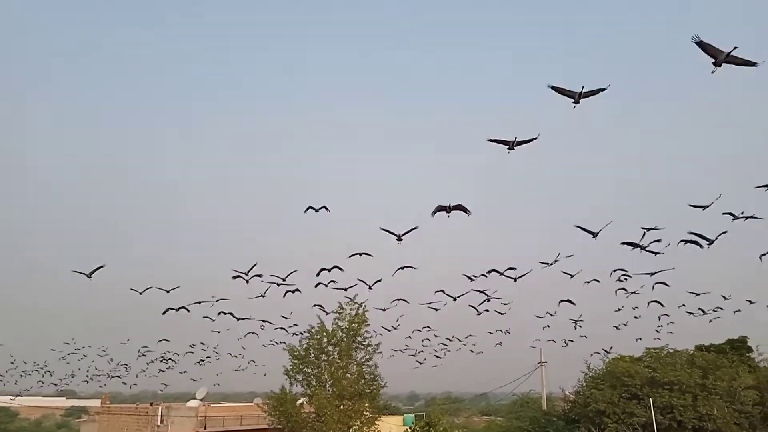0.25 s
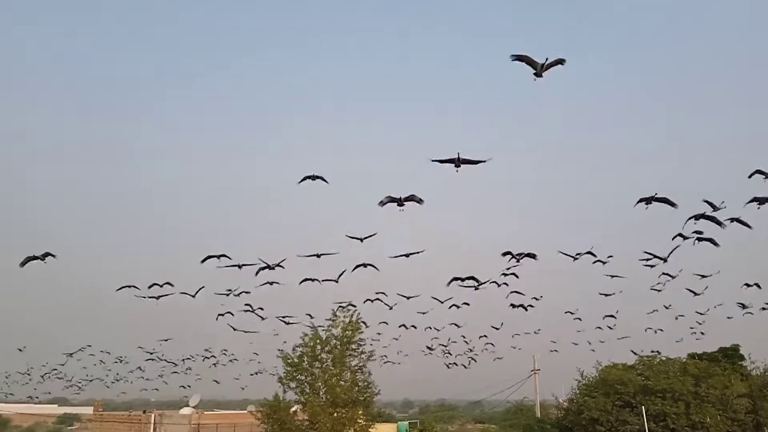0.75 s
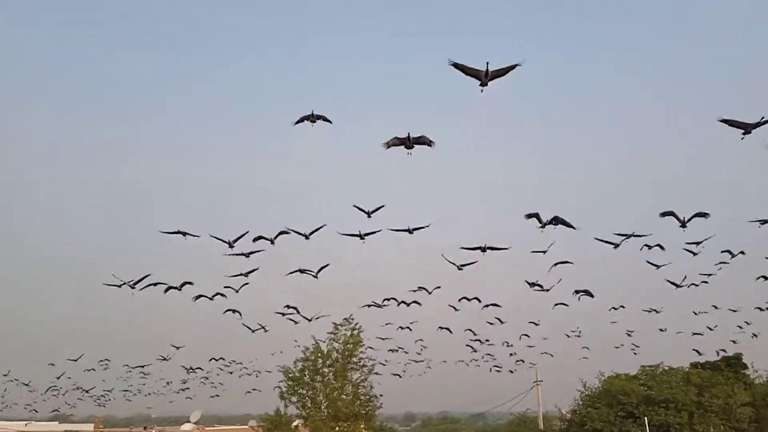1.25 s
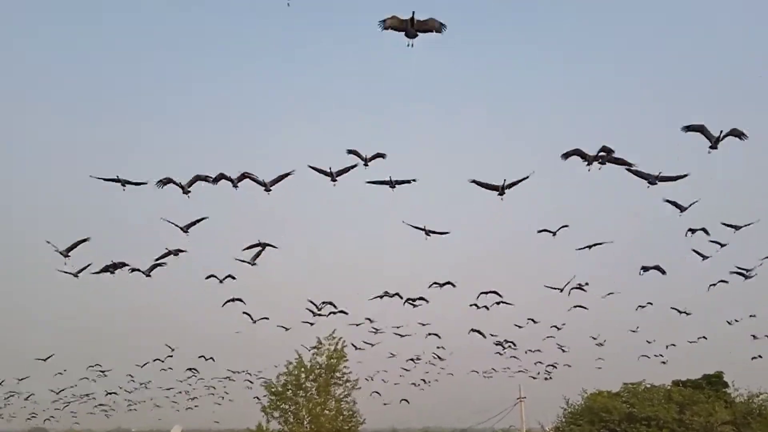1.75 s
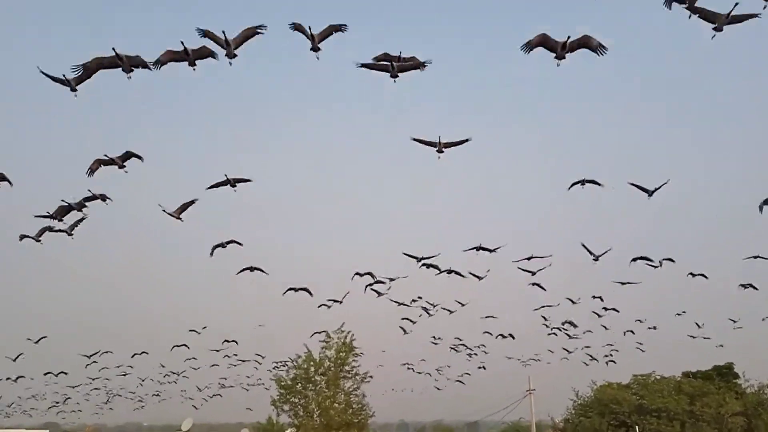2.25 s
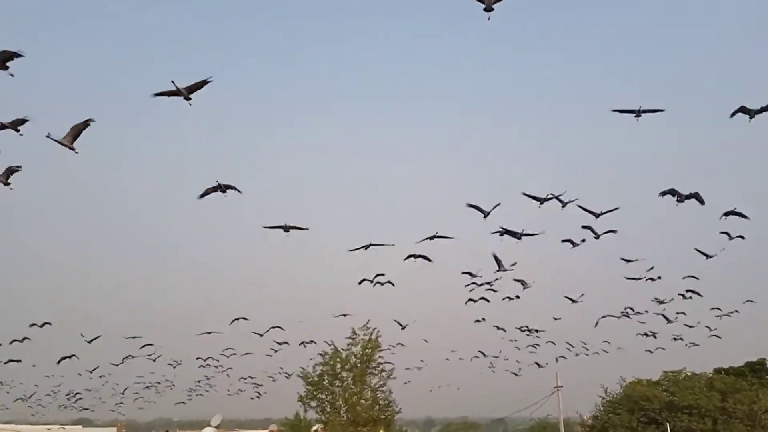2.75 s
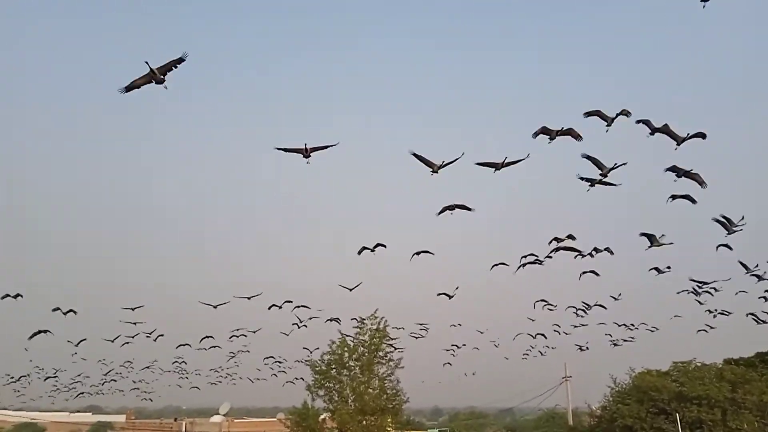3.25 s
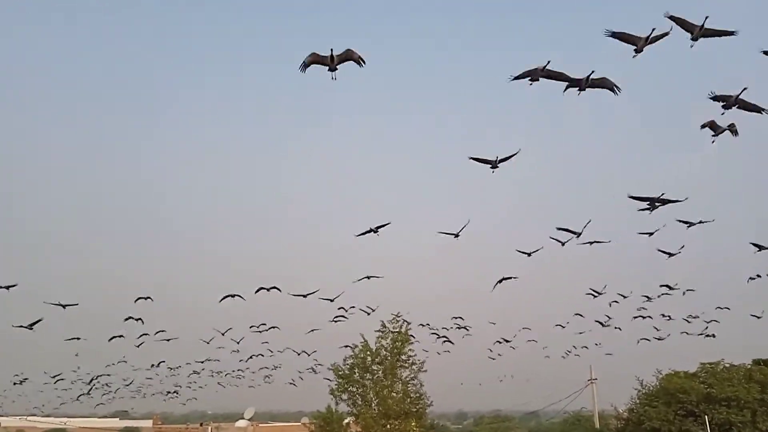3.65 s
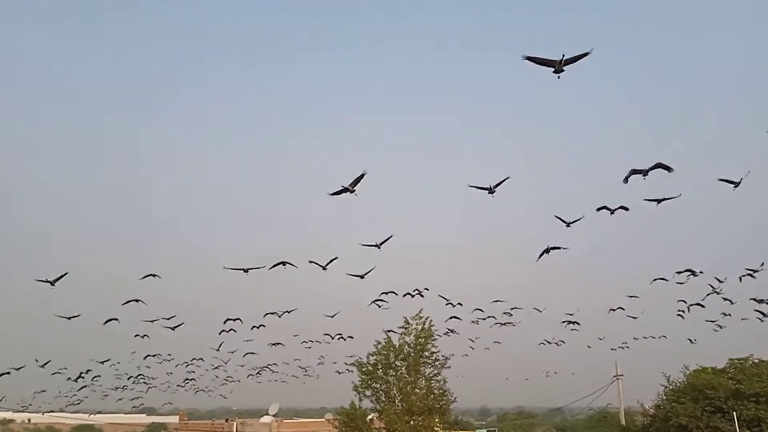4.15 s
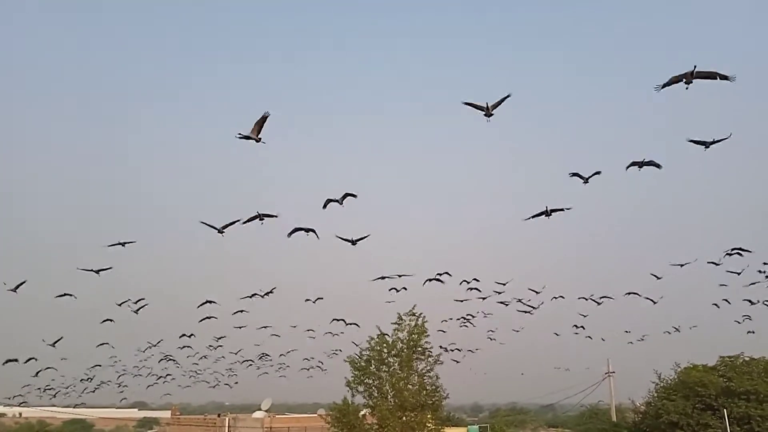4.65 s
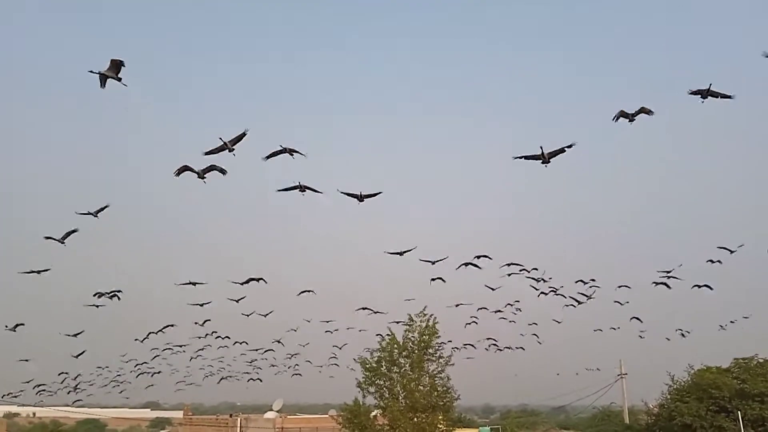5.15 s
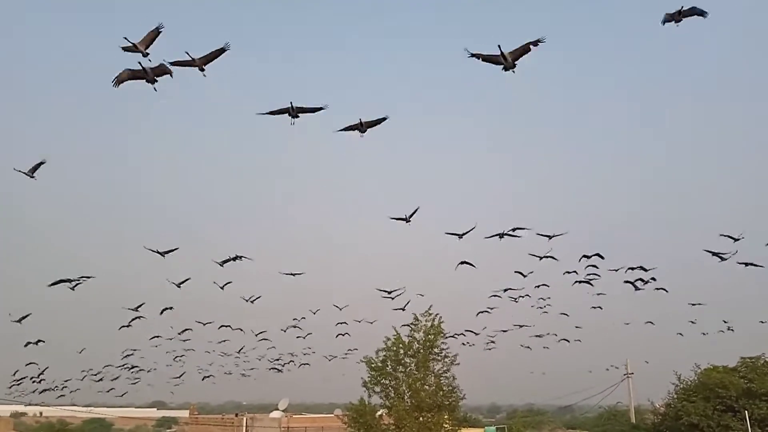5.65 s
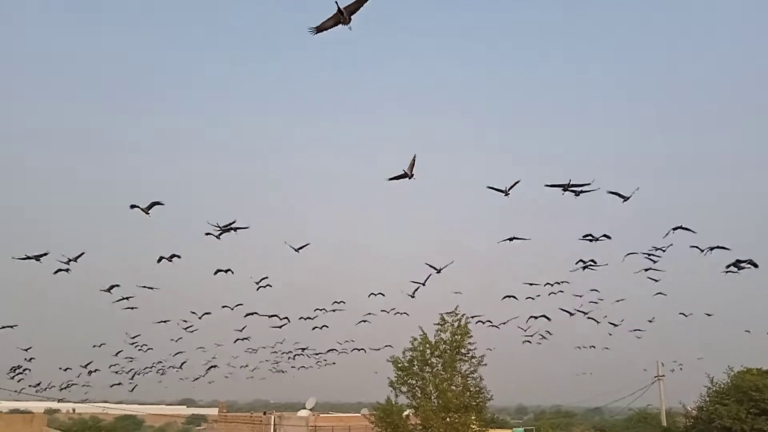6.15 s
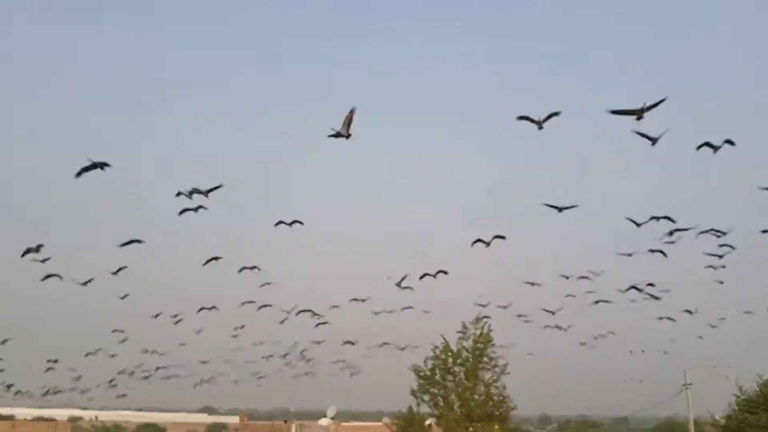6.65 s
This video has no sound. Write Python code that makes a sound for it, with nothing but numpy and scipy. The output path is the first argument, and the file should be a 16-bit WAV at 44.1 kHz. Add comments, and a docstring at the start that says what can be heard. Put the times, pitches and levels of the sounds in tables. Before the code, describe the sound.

An outdoor handheld microphone under a passing crane flock. Far birds form a steady, grainy bed of croaking trills; nearer ones surge over it with overlapping half-second rattles and brief, reedy trumpet notes. Crisp throat clicks flicker in the treble. A sharp young whistle comes past four seconds, then a strong rough bugle near five. Low rumble and faint coos stay almost buried. The end bursts into rapid, loud broken calls.

```python
"""Crane flock over a village

Hoarse rattling calls overlap into a dense chorus, made of pitch pulses and breath under two rattling gains.
Single birds bugle clear of it (stacked sines), young birds whistle (arched near sines), and slow throat
rolls click in the treble (noise bursts). Underneath, a resonator makes a low wavering hum over noise rumble,
and something like a pigeon coos faintly (arched near sines)."""
import sys
import numpy as np
from scipy import signal
from scipy.fft import rfft, irfft, next_fast_len
from scipy.io import wavfile
from scipy.ndimage import uniform_filter1d

SR = 44100
rng = np.random.default_rng(int(sys.argv[2]) if len(sys.argv) > 2 else 0)


def int16_out(signal):
    """Quantize to a 16-bit WAV file."""
    q = np.round(np.clip(np.atleast_2d(signal).T, -1, 1) * 32767)
    wavfile.write(sys.argv[1], SR, q.astype(np.int16))


N = 303918

# Far rumble. Each row: frequency in Hz, colour in dB per Hz.
RUMBLE_COLOUR = [(15, -51), (25, -19), (38, -29), (54, -23), (98, -10), (123, -2.5), (145, -3),
                 (204, -11.5), (280, -13), (362, -14), (460, -11), (600, -8), (780, -72), (1320, -120)]
RUMBLE_DB = -65
# Low hum. Each row: time in seconds, level in dB.
HUM_LEVEL = [(0.0, -63.5), (0.82, -76), (0.98, -62), (1.7, -62), (1.8, -74), (2.8, -67), (3.5, -62.5),
             (3.8, -69), (5.76, -70.5), (6.33, -65), (6.89, -67)]
HUM_HZ, HUM_WIDTH_HZ, FIRST_THROB_S = 122.7, 10.7, .025
THROB_HZ, THROB_JITTER_TURNS, THROB_SCATTER_DB, HUM_NOISE_RATIO = 15.4, 0.046, 2, 0.59

# Faint coos. Each row: start in seconds, length in seconds, first, middle and last pitch in Hz,
# mid-note level in dB, drop at the ends in dB.
COO_NOTES = [(0.76, 0.095, 457, 458, 465, -61.5, 0), (1.19, 0.3, 201.5, 259, 208, -64.5, 0),
             (1.63, 0.11, 338, 347, 340, -67, 0)]
# Whistles of young birds. Columns as for the coos.
WHISTLE_NOTES = [(0.05, 0.13, 3107, 3450, 3620, -52, 6), (1.97, 0.12, 2835, 3150, 3230, -49.5, 5),
                 (2.53, 0.077, 3179, 3330, 3480, -51, 6), (3.945, 0.185, 2230, 2950, 3430, -43, 1),
                 (4.135, 0.035, 3080, 3060, 3050, -44, 2), (4.414, 0.115, 3580, 3760, 3290, -31, 12)]

# Throat rolls of the nearest birds. Each row: start in seconds, length in seconds,
# stroke level in dB before smoothing, dullness 0-1.
THROAT_ROLLS = [(0.106, 0.023, -51, 0), (0.41, 0.054, -43.5, 0), (0.688, 0.12, -49, .2),
                (0.974, 0.034, -46, 0), (1.237, 0.018, -49, 0), (1.317, 0.029, -41, 0), (1.464, 0, -52, .5),
                (1.73, 0.06, -54, 0), (2.005, 0.059, -43, 0), (2.225, 0.035, -43, .7), (2.48, 0.13, -45, 0),
                (2.836, 0.03, -51, 0.6), (3.045, 0.12, -41, .3), (3.517, 0.026, -48, 0),
                (3.672, 0, -36, .9), (3.733, 0, -42, .8), (3.795, 0.134, -41, .85), (4.031, 0, -43, .7),
                (4.212, 0.068, -37, 1), (4.54, 0.093, -55, 0), (5.114, 0.095, -40, .4),
                (5.302, 0.038, -46, 0), (5.364, 0.027, -45, 0), (5.47, 0.11, -50, 0), (6.11, 0.15, -45, .4),
                (6.278, 0.02, -50, 0), (6.554, 0.056, -50, 0)]
# Bright beat. Each row: frequency in Hz, colour in dB per Hz.
BRIGHT_BEAT_COLOUR = [(700, -28), (1500, -10), (3000, -6), (4500, -1), (6000, -1), (9500, -4), (13500, -19),
                      (14800, -6), (16000, -6)]
# Beat from a bird facing away. Each row: frequency in Hz, colour in dB per Hz.
DULL_BEAT_COLOUR = [(1500, -30), (3000, -6), (4500, 0), (6500, -1), (8500, -14), (12000, -30)]
BEAT_GAP_S, BEAT_JITTER_S, BEAT_SCATTER_DB = .034, .001, 1.5

# Single calls. Each row: start in seconds, length in seconds, first and last pitch in Hz, base level in dB,
# then over it: extra on the fundamental in dB, higher multiples in dB; last, roughness 0-1.
BUGLE_CALLS = [(0.115, 0.15, 1243, 1252, -52.5, 13.5, -1.5, 0.1),
               (0.272, 0.2, 1114, 1034, -47, 6.5, -24, 0.44),
               (0.451, 0.13, 1133, 1075, -41.5, -3, -17, 0.83),
               (0.679, 0.23, 1111, 1105, -50, 3, -24, 0.55), (0.93, 0.19, 1246, 1240, -42, -1, -14.5, 0.15),
               (1.003, 0.05, 750, 744, -53, -7, -30, 0.44),
               (1.054, 0.094, 1259, 1173, -36.5, -0.5, -17, 0.46),
               (1.293, 0.14, 924, 910, -42, 5, -13, 0.3), (1.332, 0.16, 1223, 1250, -48, 4, -10, 0.15),
               (1.345, 0.075, 900, 850, -38.5, -8, -24, 0.6), (1.39, 0.06, 852, 783, -41, 16, -25, 0.1),
               (1.398, 0.157, 1070, 1101, -50, 16.5, -10, 0.49),
               (1.525, 0.14, 867, 807, -36.5, -5, -10, 0.44),
               (1.719, 0.079, 1170, 1175, -42.5, 3.5, -14, 0.7),
               (1.75, 0.21, 1232, 1222, -37.5, -3, -15, 0.33),
               (2.035, 0.083, 1130, 1097, -39, -9, -22, 0.52),
               (2.045, 0.22, 965, 865, -32.5, -4, -18, 0.51),
               (2.187, 0.13, 1092, 1030, -54.5, 15, -13, 0.41),
               (2.282, 0.076, 950, 952, -37.5, -7, -30, 0.88),
               (2.582, 0.059, 1133, 1052, -35, -6, -24, 0.5),
               (2.881, 0.085, 1132, 1132, -35.5, -14, -34, 0.095),
               (2.97, 0.13, 885, 820, -29.5, 5, -30, 0.55), (3.22, 0.13, 899, 846, -35, -8, -17, 0.42),
               (3.249, 0.21, 1430, 1384, -39, 6, -18, 0.59), (3.32, 0.19, 1194, 1200, -33, 0, -18, 0.15),
               (3.505, 0.04, 1120, 1120, -29, -22, -28, 0.15),
               (3.578, 0.13, 906, 905, -24.5, -9, -21, 0.51), (3.604, 0.11, 1405, 1350, -41, 3, -20, 0.63),
               (3.705, 0.099, 902, 885, -31, 21.5, -26, 0.35),
               (3.702, 0.047, 1155, 1142, -29.5, 0, -28, 0.18),
               (3.898, 0.13, 1081, 1101, -41, 9.5, -25, 0.49), (4.005, 0.059, 1132, 1144, -42, 6, -16, .4),
               (4.076, 0.12, 1112, 1063, -38, 4.5, -20, 0.46), (4.181, 0.057, 949, 913, -30, 11, -17, 0.77),
               (4.24, 0.036, 1043, 1060, -37.5, 12, -20, 0.6), (4.31, 0.11, 1192, 1200, -44, 4, -12, 0.21),
               (4.312, 0.12, 885, 840, -30, -8, -18, 0.55), (4.553, 0.11, 900, 930, -41, 8, -20, 0.086),
               (4.801, 0.3, 1404, 1395, -22, -15, -38, 0.71), (4.95, 0.1, 1394, 1362, -42, 4, -21, 0.077),
               (4.88, 0.13, 1000, 1096, -58, 3, 0, .5), (5.045, 0.1, 1100, 1035, -33, -0.5, -13.5, 0.76),
               (5.116, 0.13, 965, 893, -29.5, .5, -15.5, 1), (5.262, 0.051, 915, 867, -30, 3, -28, 0.48),
               (5.345, 0.098, 1150, 1121, -31, -6, -15, 0.61),
               (5.441, 0.12, 1230, 1149, -33, 0, -16.5, 0.23),
               (5.49, 0.091, 1110, 1077, -45.5, 15, -22, 0.75),
               (5.585, 0.1, 1060, 1023, -49, 18.5, -19, 0.78), (5.4, 0.1, 1330, 1395, -42, 8, -30, 0.77),
               (5.535, 0.15, 1449, 1388, -33, 6, -35, 0.48), (5.73, 0.13, 898, 920, -38, 5, -24, 0.41),
               (5.96, 0.11, 1274, 1312, -52, 10, -8, 0.27), (6.057, 0.1, 830, 896, -38.5, -6, -14, 0.97),
               (6.2, 0.087, 1167, 1124, -47.5, 15, -8, 0.89), (6.455, 0.12, 760, 723, -44.5, -3, -11, 0.5),
               (6.565, 0.087, 1035, 996, -35, -10, -10.5, 1),
               (6.64, 0.13, 1082, 1145, -39.5, -16, -6.5, 0.67),
               (6.635, 0.18, 1310, 1205, -39.5, 6.5, -17, 0.76),
               (6.637, 0.027, 1100, 1130, -29.5, -4.5, -15, 0.92),
               (6.686, 0.021, 1115, 1126, -23.5, -11, -28, 0.6),
               (6.722, 0.058, 1100, 1060, -27.5, -9, -23, 0.66),
               (6.788, 0.035, 1120, 1090, -35, -2, -18, 0.99),
               (6.824, 0.037, 1130, 1060, -27, -10, -26, 0.6),
               (6.858, 0.025, 1120, 1100, -34, -1, -26, 0.91)]
# Broad windpipe resonance. Each row: frequency of a multiple in Hz, gain in dB.
WINDPIPE_GAIN = [(750, -4.5), (900, -27), (1100, -2), (1300, -4), (2250, 0), (2500, -1.5), (2800, -24),
                 (3350, -37), (6000, -45)]
# Higher multiples. Each row: frequency in Hz, gain in dB.
OVERTONE_GAIN = [(3000, -2), (3600, -6.5), (4500, 0), (5400, -3), (6500, -4), (7600, -10), (8700, -14),
                 (10000, -11), (11300, -13), (12300, -25), (13500, -30), (15000, -17)]
# Multiples above 7.5 kHz, which carry only early on. Each row: time in seconds, gain in dB.
TOP_GAIN = [(0, 0), (1.4, 1), (1.9, -4), (2.2, -13), (6.89, -13)]
RING_HZ, RING_HALF_WIDTH_HZ, RING_DB = 3660, 200, 12   # narrow resonance, for clear calls
GLIDE_EXPONENT = 1.4   # pitch bends most at the end
BLINK_DB, HOARSE_TOP_LOSS_DB = 4.68, 20

# Usual pitches in the flock, before glide and waver: one column, in Hz.
FLOCK_PITCHES_HZ = [718.6, 784.8, 861.2, 918.3, 996.4, 1060, 1123, 1189.5, 1274.3, 1395.6]
# Chorus before its bands are levelled. Each row: frequency in Hz, colour in dB per Hz.
THROAT_COLOUR = [(300, -47), (420, -25), (600, -14), (790, -7), (1070, -5), (1410, -3.5), (1780, -2.5),
                 (2010, -4), (2240, -2.5), (3090, -15), (3750, -16.5), (4600, -12), (5900, -12.5),
                 (6990, -20.5), (8280, -33.5), (13500, -46), (14800, -36), (16000, -36)]
# Long hoarse calls of near birds. Each row: start in seconds, length in seconds,
# level in dB before the band offsets, brightness in dB, depth in dB.
HOARSE_CALLS = [(0.013, 0.5, -36.5, 2, -12), (0.252, 0.43, -39, 5, -1), (0.632, 0.27, -54, 16, 17),
                (0.889, 0.3, -36, 7, -13), (1.152, 0.34, -35.5, 7, -3.5), (1.341, 0.34, -37.5, 8.5, -3),
                (1.688, 0.37, -37, -3, -36), (1.947, 0.4, -40, 10, -19), (2.097, 0.41, -43, 10.5, 10),
                (2.406, 0.37, -41.5, 5, 8.5), (2.84, 0.44, -34.5, 6, -1), (3.167, 0.53, -32.5, -5.5, -0.5),
                (3.44, 0.44, -30.5, 1, 1), (3.79, 0.4, -32, 2.5, -18), (3.92, 0.48, -39.5, 5, 6.5),
                (4.192, 0.4, -36, -6, 5.5), (4.488, 0.25, -34, -32, 1), (4.835, 0.45, -35, 0.5, -15.5),
                (5.007, 0.42, -33.5, 0.5, 5.5), (5.247, 0.48, -32, 1.5, -2.5), (5.704, 0.3, -35, -4, -17),
                (5.846, 0.34, -36, -2.5, -4.5), (6.002, 0.43, -35.5, 1.5, -0.5), (6.256, 0.4, -42, -3, 7.5),
                (6.505, 0.33, -34, 1.5, -1), (6.728, 0.23, -30.5, 5.5, 1.5)]
# Chorus bands. Each row: low edge in Hz, high edge in Hz, far flock in dB,
# near bird over its level in dB, share of brightness, share of depth.
CHORUS_BANDS = [(478, 860, -62.5, -16, 0, 0.98), (950, 1620, -44, -1, 0, 0.13),
                (1644, 3020, -42.5, -2, 0.05, 0.27), (2780, 5660, -50.5, -6.5, 0.2, 0.29),
                (6280, 12200, -56.5, -16, 1.14, 0.046), (13600, 21400, -72, -27, 1.2, 0.063)]
HOARSE_ATTACK_S, HOARSE_RELEASE_S = 0.14, 0.17

CUTOFF_HZ = 15830


def from_db(db):
    """Gain of a level in dB."""
    return 10 ** (np.asarray(db) / 20)


def rms_one(x):
    """Scaled to rms 1."""
    return x / np.sqrt(np.mean(x ** 2) + 1e-20)


def at_hz(points, hz):
    """A spectrum read on a log-frequency axis."""
    points = np.array(points)
    return np.interp(np.log(np.maximum(hz, 1)), np.log(points[:, 0]), points[:, 1])


def coloured(x, spectrum):
    """Filters a signal by a colour curve in dB."""
    size = next_fast_len(N)
    hz = np.arange(size // 2 + 1) * SR / size
    return irfft(rfft(x, size) * from_db(at_hz(spectrum, hz)), size)[:N]


def drift(rate_hz, size=N):
    """Random drift: unit-spread knots at twice the rate, joined by straight lines."""
    knots = rng.standard_normal(int(N / SR * rate_hz * 2) + 9)
    return np.interp(np.arange(size) * rate_hz * 2 / SR, np.arange(len(knots)), knots)


def rattle(rate_hz, sharp, size=N):
    """The syrinx snaps open and sags shut unevenly: a throbbing gain of rms about 1."""
    turn = (rng.random() + np.cumsum(rate_hz * (1 + .15 * drift(40, size))) / SR) % 1
    throb = np.exp(-sharp * turn) * from_db(2.2 * drift(90, size))
    rounded = uniform_filter1d(uniform_filter1d(throb, size=30), size=30)   # edges about 1 ms
    return rms_one(rounded)


def rumble():
    """Patchy far rumble: coloured noise whose level drifts."""
    level_db = RUMBLE_DB + 1.1 * drift(7.4)
    return from_db(level_db) * rms_one(coloured(rng.standard_normal(N), RUMBLE_COLOUR))


def hum():
    """A narrow resonator driven by slow, uneven beats and noise."""
    turns = THROB_HZ * (np.arange(N) / SR - FIRST_THROB_S) + THROB_JITTER_TURNS * drift(2.2)
    beats = np.diff(np.floor(turns), prepend=-1).clip(0, 1)
    push = rms_one(beats * from_db(THROB_SCATTER_DB * rng.standard_normal(N)))
    push = push + HUM_NOISE_RATIO * rng.standard_normal(N)
    r = np.exp(-np.pi * HUM_WIDTH_HZ / SR)
    tone = signal.lfilter([1, 0, -1], [1, -2 * r * np.cos(2 * np.pi * HUM_HZ / SR), r * r], push)
    tone = rms_one(coloured(tone, [(60, -4), (123, -1.5), (250, -41)]))
    s, level_db = np.transpose(HUM_LEVEL)
    return from_db(np.interp(np.arange(N) / SR, s, level_db)) * tone


def piped(notes, octave_db):
    """Wavering near sines with a weak octave; pitch and level arch over the note."""
    out = np.zeros(N)
    for s, length_s, first_hz, middle_hz, last_hz, level_db, ends_db in notes:
        size = int(length_s * SR)
        along = np.linspace(-1, 1, size)
        slope_hz = (last_hz - first_hz) / 2
        arch_hz = (first_hz + last_hz) / 2 - middle_hz
        hz = middle_hz + along * slope_hz + along ** 2 * arch_hz
        phase = 2 * np.pi * np.cumsum(hz * (1 + .014 * drift(110, size))) / SR
        fade = np.minimum(1, (1 - abs(along)) * length_s / .024) * from_db(3.5 * drift(35, size))
        tone = np.sin(phase) + from_db(octave_db) * np.sin(2 * phase)
        out[int(s * SR):][:size] += np.sqrt(2) * fade * from_db(level_db - ends_db * along ** 2) * tone
    return out


def coos():
    """Low arched notes with a weak octave, something like a pigeon."""
    return piped(COO_NOTES, octave_db=-24.0)


def whistles():
    """Young birds: high arched notes, nearly pure."""
    return piped(WHISTLE_NOTES, octave_db=-28.0)


def throat_rolls():
    """Nearly even beats: short noise rasps, bright or dull, each followed by its bounce off the ground."""
    strokes = np.zeros((2, N))
    for start, length_s, level_db, dull in THROAT_ROLLS:
        s = np.linspace(start, start + length_s, round(length_s / BEAT_GAP_S) + 1)
        s = s + BEAT_JITTER_S * rng.standard_normal(8)[:len(s)]
        gain = from_db(level_db + BEAT_SCATTER_DB * rng.standard_normal(8)[:len(s)])
        gain = gain * np.sqrt(np.clip([[1 - dull], [dull]], 0, 1))
        strokes[:, (s * SR).astype(int)] += gain
        strokes[:, ((s + .008) * SR).astype(int)] += gain * from_db(-2.0)
    fall = np.exp(-1 / (0.0047 * SR))
    decays = signal.lfilter([1], [1, -fall], strokes + 1e-18)
    bright_gate, dull_gate = uniform_filter1d(decays, size=90)   # rises over 2 ms
    bright = bright_gate * rms_one(coloured(rng.standard_normal(N), BRIGHT_BEAT_COLOUR))
    return bright + dull_gate * rms_one(coloured(rng.standard_normal(N), DULL_BEAT_COLOUR))


def multiples_db(s, first_hz, level_db, first_db, higher_db, rough):
    """Levels of 12 multiples: windpipe and narrow resonances, with a loss at the top."""
    k = np.arange(1, 13)
    hz = k * first_hz
    ring_db = RING_DB * (1 - rough) * (abs(hz - RING_HZ) < RING_HALF_WIDTH_HZ)
    higher = np.where(k > 2, higher_db + at_hz(OVERTONE_GAIN, hz) + ring_db, -np.inf)
    db = level_db + np.maximum(at_hz(WINDPIPE_GAIN, hz), higher)
    db = db + first_db * (k == 1) + rng.normal(0, 1.5, 12)
    return db + (hz > 7500) * (np.interp(s, *np.transpose(TOP_GAIN)) - HOARSE_TOP_LOSS_DB * rough)


def bugles():
    """Stacks of multiples on a gliding pitch; hoarse calls waver, buzz fast and roll slowly."""
    out = np.zeros(N + SR)
    k = np.arange(1, 13)
    for s, length_s, first_hz, last_hz, level_db, first_db, higher_db, rough in BUGLE_CALLS:
        size, rough = int(length_s * SR), np.clip(rough, 0, 1)
        along = np.arange(size) / size
        waver = .035 * rough * drift(120, size) + .004 * drift(18, size)
        glide_hz = first_hz + (last_hz - first_hz) * along ** GLIDE_EXPONENT
        phase = 2 * np.pi * np.cumsum(glide_hz * (1 + waver)) / SR
        db = multiples_db(s, first_hz, level_db, first_db, higher_db, rough)
        # each higher multiple comes and goes on its own
        blink = from_db([db[n - 1] + BLINK_DB * (n > 2) * np.tanh(drift(28, size)) for n in k])
        start_phase = rng.uniform(0, 2 * np.pi, (12, 1))
        voice = np.sum(blink * np.sin(np.outer(k, phase) + start_phase), axis=0)
        buzz = 1 - rough + rough * rattle(rng.uniform(110, 160), 2.1, size)
        roll = 1 - .7 * rough + .7 * rough * rattle(rng.uniform(27, 34), 2.0, size)
        flutter = from_db(2.5 * np.tanh(drift(30, size)))   # the call's loudness flutters unevenly
        swell = np.minimum(along * length_s / min(.03, length_s / 4), 3 * (1 - along))
        swell = np.minimum(1, swell)
        out[int(s * SR):][:size] += np.sqrt(2) * voice * buzz * roll * flutter * swell
    return out[:N]


def hoarse_bird(waver, breath):
    """One bird calling repeatedly: a pulse per cycle, a new pitch per short call, breath through the rattle."""
    ends = np.cumsum(rng.uniform(.06, .18, 130)) * SR - .1 * SR
    call = np.searchsorted(ends, np.arange(N))
    remaining = (ends[call] - np.arange(N)) / np.diff(ends, prepend=-.3 * SR)[call]
    bend = rng.normal(.05, .05, 130)[call] * (.33 - (1 - remaining) ** 2)   # mostly falling
    glide = 1 + rng.normal(0, .04, 130)[call] + bend
    wobble = 1 + waver * rng.uniform(.3, 1.7, 130)[call] * drift(150)
    pitch_hz = rng.choice(FLOCK_PITCHES_HZ, 130)[call] * glide * wobble
    pulses = np.diff(np.floor(np.cumsum(pitch_hz) / SR), prepend=0)
    voice = rms_one(pulses - pulses.mean()) + breath * rng.standard_normal(N)
    effort = np.sin(np.pi * remaining) * from_db(rng.normal(0, 1.4, 130))[call]
    throat_roll = 0.55 + 0.43 * rattle(rng.uniform(26, 35), sharp=2.6)
    buzz = 0.33 + 0.66 * rattle(rng.uniform(105, 175), sharp=3.23)
    return voice * effort * throat_roll * buzz


def chorus():
    """Many birds at once: a dull steady far flock, and over it the long, louder, brighter calls of near birds."""
    flock = coloured(sum(hoarse_bird(waver=.019, breath=.2) for bird in range(12)), THROAT_COLOUR)
    s, length_s, level_db, bright_db, deep_db = np.transpose(HOARSE_CALLS)[..., None]
    t = np.arange(0, N + 64, 64) / SR
    attack = np.clip((t - s) / HOARSE_ATTACK_S, 0, 1)
    swell = attack * np.clip((s + length_s - t) / HOARSE_RELEASE_S, 0, 1)
    out = 0
    for low_hz, high_hz, far_db, near_db, bright, deep in CHORUS_BANDS:
        band_filter = signal.butter(4, [low_hz, high_hz], "band", fs=SR, output="sos")
        band = signal.sosfilt(band_filter, flock)
        even = band / np.sqrt(uniform_filter1d(band ** 2, size=SR // 14) + 1e-12)
        near = swell * from_db(level_db + near_db + bright * bright_db + deep * deep_db)
        gain = np.sqrt(from_db(far_db) ** 2 + np.sum(near ** 2, axis=0))
        out = out + even * np.interp(np.arange(N) / SR, t, gain)
    return out


def echoes(near):
    """Three dull echoes from roofs and walls: delayed, low-passed copies."""
    dull = signal.lfilter([.3], [1, -.7], near)
    out = np.zeros(N)
    for lag_s, db in [(.023, -13), (.051, -19), (.087, -23)]:
        out += from_db(db) * np.r_[np.zeros(int(lag_s * SR)), dull][:N]
    return out


def scene():
    """Rumble, hum, coos and chorus, with the clear near calls and their echoes."""
    near = whistles() + throat_rolls() + bugles()
    # small throats give no bass
    near = signal.sosfilt(signal.butter(4, 600, "high", fs=SR, output="sos"), near)
    return (rumble() + hum() + coos() + near + echoes(near) + chorus())[None]


def record(dry):
    """The top is cut steeply by an elliptic low-pass."""
    return signal.sosfilt(signal.ellip(14, .5, 60, CUTOFF_HZ, fs=SR, output="sos"), dry)


dry = scene()
out = record(dry)
int16_out(out)
```